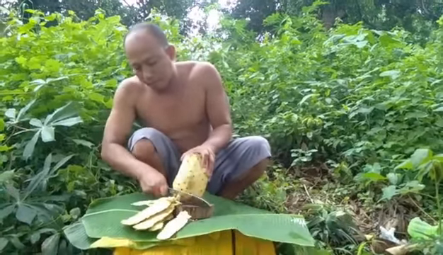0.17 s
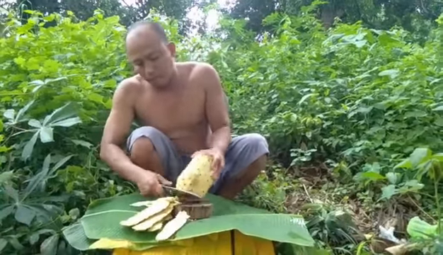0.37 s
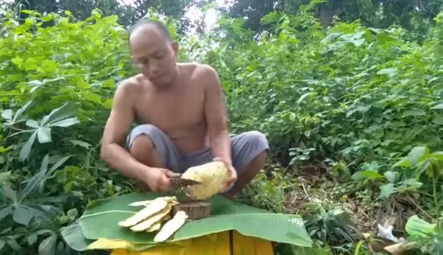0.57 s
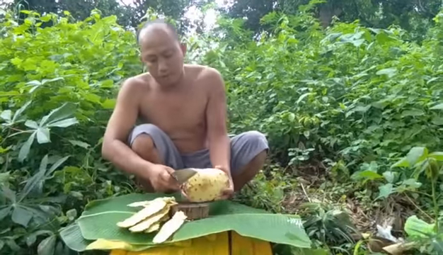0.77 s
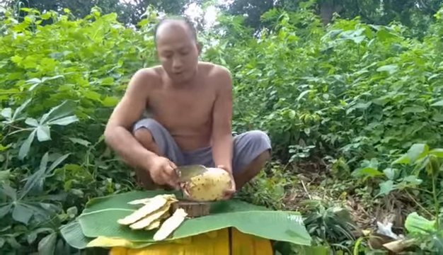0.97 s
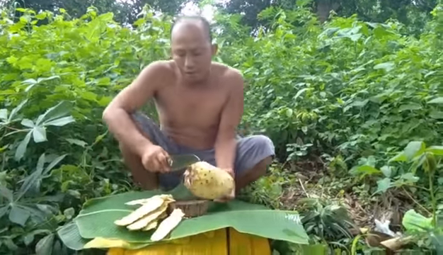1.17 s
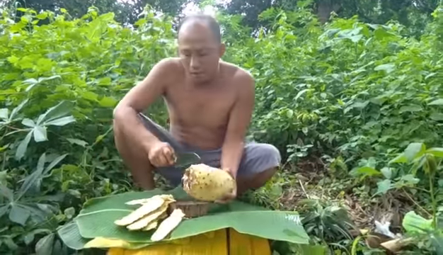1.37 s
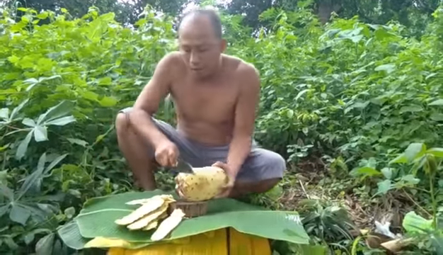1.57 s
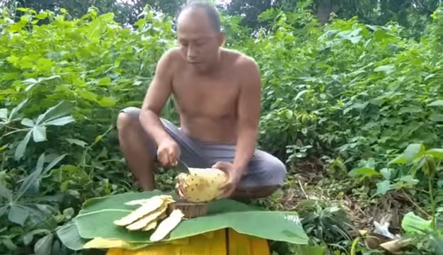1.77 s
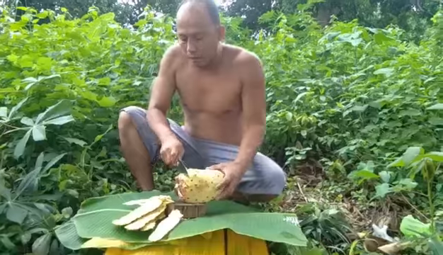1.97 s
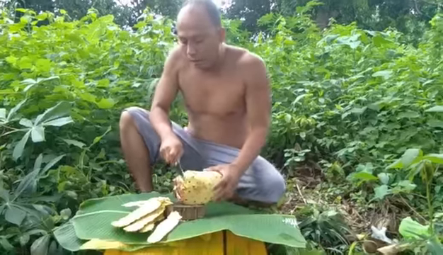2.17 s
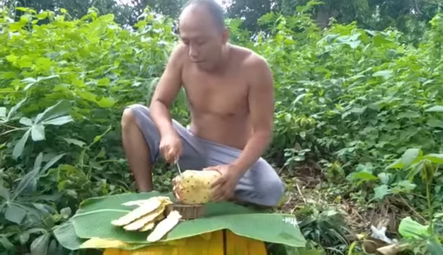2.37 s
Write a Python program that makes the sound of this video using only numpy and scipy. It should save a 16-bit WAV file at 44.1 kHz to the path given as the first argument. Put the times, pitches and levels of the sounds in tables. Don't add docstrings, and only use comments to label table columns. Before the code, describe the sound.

Cleaver cutting pineapple rind with crisp snaps and one woody chop, insects and birds around

```python
import sys
import numpy as np
from scipy import signal
from scipy.fft import rfft, irfft
from scipy.io import wavfile

SR = 44100
rng = np.random.default_rng(int(sys.argv[2]) if len(sys.argv) > 2 else 0)


def pcm_store(signal):
    levels = np.round(np.clip(np.atleast_2d(signal), -1, 1) * 32767)
    wavfile.write(sys.argv[1], SR, levels.astype(np.int16).T)


def to_linear_factor(level_db):
    exponent = np.asarray(level_db, float) / 20
    return 10 ** exponent


N = 110250
T = np.arange(N) / SR


def rms_one(x):
    return x / np.sqrt(np.mean(x ** 2) + 1e-20)


def drift(rate_hz):
    r = np.exp(-2 * np.pi * rate_hz / SR)
    wander = signal.lfilter([1], [1, -2 * r, r * r], rng.standard_normal(N + SR))
    return rms_one(wander[SR:])


def click_at(start_s):
    return 1. * (np.arange(N) == int(start_s * SR))


def ring(clicks, hz, t60_s):
    r = to_linear_factor(-60 / (t60_s * SR))
    w = 2 * np.pi * hz / SR
    return signal.lfilter([0, np.sin(w)], [1, -2 * r * np.cos(w), r * r], clicks + 1e-18)


def curve(rows):
    db = np.interp(T, *np.transpose(rows))
    return db - db.mean()


def bed(spectrum, patchy_db, low_db=0):
    hz = np.fft.rfftfreq(N, 1 / SR) + 1
    at_hz, at_db = np.transpose(spectrum)
    colour_db = np.interp(np.log(hz), np.log(at_hz), at_db, -120, -120)
    tint = rfft(rng.standard_normal(N)) * to_linear_factor(colour_db)
    band = np.floor(2 * np.log2(hz))
    lowest, highest = int(2 * np.log2(at_hz[0])), int(2 * np.log2(at_hz[-1]))
    out = 0
    for k in range(lowest, highest + 1):
        level_db = patchy_db * drift(5.0) + low_db * (k < 16)
        out = out + irfft(tint * (band == k), N) * to_linear_factor(level_db)
    return rms_one(out)


# pitch_hz, level_db (per Hz)
AIR = [(18, -36), (30, -25.5), (113, -1.5), (191, -11.5), (210, -15.5), (256, -13.5), (462, -25.5),
       (544, -25.5), (1500, -31.5), (1950, -47), (3300, -120)]
AIR_DB, AIR_PATCHY_DB = -46.5, 0.5
# time_s, level_db
BREEZE = [(0.0, -49), (0.29, -45.5), (0.51, -48.5), (1.02, -48), (1.29, -49.5), (1.52, -49), (1.9, -49.5),
          (2.02, -51.5), (2.5, -50)]
# pitch_hz, level_db (per Hz)
INSECT_HISS = [(880, -36), (1500, -3), (1970, -3), (2380, -4.5), (4890, -4), (6410, 0.5), (7540, -8),
               (7950, -15), (9500, -27), (12400, -46), (20900, -120)]
INSECT_DB, INSECT_PATCHY_DB = -57.5, 1.33
# time_s, level_db
CHORUS = [(0, 5.5), (.3, 1), (.55, 4), (.85, 0.5), (1.1, 7), (1.4, 3), (1.7, 7), (2.1, -0.5), (2.5, 5)]
# pitch_hz, level_db (per Hz)
MIC_HISS = [(5000, -43), (8500, -4), (10700, -3), (12400, -8), (14900, -3), (15700, -3)]
MIC_HISS_DB, MIC_PATCHY_DB = -81, 0.73


def garden():
    insects = bed(INSECT_HISS, INSECT_PATCHY_DB)
    chorus_band = signal.butter(2, [5200, 7800], "band", fs=SR, output="sos")
    chorus = signal.sosfilt(chorus_band, insects)
    insects = insects + (to_linear_factor(curve(CHORUS)) - 1) * chorus
    rumble = bed(AIR, AIR_PATCHY_DB, curve(BREEZE))
    return to_linear_factor(AIR_DB) * rumble + to_linear_factor(MIC_HISS_DB) * bed(MIC_HISS, MIC_PATCHY_DB) + to_linear_factor(INSECT_DB) * insects


LEAF_T60_S, LEAF_LIFT_HZ, LEAF_LIFT_DB = 0.44, 9367, -41
TWIG_T60_S, TWIG_DB = 0.074, -13


def foliage(x, wet_db):
    lag = np.arange(SR) / SR
    leaves = rng.standard_normal(SR)
    leaves = leaves + to_linear_factor(LEAF_LIFT_DB) * rms_one(ring(leaves, LEAF_LIFT_HZ, 0.0028))
    haze = to_linear_factor(-60 * lag / LEAF_T60_S)
    twigs = to_linear_factor(TWIG_DB - 60 * lag / TWIG_T60_S)
    tail = leaves * (haze + twigs) * np.minimum(lag / 0.0029, 1)
    tail = tail / np.sqrt(np.sum(tail ** 2))
    return x + to_linear_factor(wet_db) * signal.fftconvolve(x, tail)[:len(x)]


# start_s, level_db, top_pitch_hz
CHIPS = [
    (-.016, -43.5, 8770),
    (0.228, -42, 8660),
    (.664, -43, 8850),
    (0.959, -47, 8930),
    (1.411, -45.5, 8830),
    (1.924, -49, 9030),
]
CHIP_HOLD_S, CHIP_LIFT_HZ_PER_S, CHIP_FALL_HZ_PER_S2 = .008, 25000, 8.2e6
CHIP_SWELL_S, CHIP_RISE_DB_PER_S = 0.027, 450
CHIP_FLOOR_HZ, CHIP_FADE_DB_PER_HZ = 6900, .006
CHIP_THROAT_DB, CHIP_OVERTONE_DB, CHIP_ECHO_DB = 4.5, -39, 2.4


def chips():
    lead = SR // 20
    t = np.arange(SR // 20) / SR
    out = np.zeros(N + SR)
    for start_s, db, top_hz in CHIPS:
        plunge_hz = CHIP_FALL_HZ_PER_S2 * np.maximum(t - CHIP_HOLD_S, 0) ** 2
        hz = np.maximum(top_hz + CHIP_LIFT_HZ_PER_S * t - plunge_hz, 0)
        rise_db = CHIP_RISE_DB_PER_S * np.minimum(t - CHIP_SWELL_S, 0)
        fade_db = CHIP_FADE_DB_PER_HZ * np.maximum(CHIP_FLOOR_HZ - hz, 0)
        throat_db = CHIP_THROAT_DB * np.exp(-((hz - 7100) / 500) ** 2)
        tremble_db = 1.6 * drift(290.0)[:len(t)]
        level = to_linear_factor(db + rise_db - fade_db + throat_db + tremble_db) * np.minimum(t / 0.0029, 1)
        turn = 2 * np.pi * np.cumsum(hz) / SR
        note = np.sin(turn) + to_linear_factor(CHIP_OVERTONE_DB) * np.sin(2 * turn)
        i = int(start_s * SR) + lead
        out[i:i + len(t)] += level * note
    return foliage(out, CHIP_ECHO_DB)[lead:lead + N]


def swell(start_s, length_s, edge_s):
    opening = T - start_s
    closing = (start_s + length_s - T) / 2 + edge_s
    return np.clip(np.minimum(opening, closing) / edge_s, 0, 1) ** 2


# start_s, length_s, level_db, pitch_hz, glide_hz_per_s
WHISTLES = [(.018, .022, -53, 2900, 2000), (.05, .035, -57, 3000, 0), (.167, .013, -48, 3800, 8000),
            (1.865, .1, -56, 3900, 300), (1.88, .075, -56, 3800, 300), (1.96, .115, -65, 3930, 0),
            (2.333, .008, -59, 4850, 0), (2.357, .03, -59, 4350, -3000), (2.397, .03, -58, 4400, -4000),
            (2.395, .025, -62, 4850, 0), (2.412, .016, -57, 4830, 0), (2.386, .018, -56, 4050, -4000),
            (2.41, .018, -62, 3800, 0), (2.44, .035, -59, 4200, 5000), (2.435, .045, -62, 4830, 0),
            (2.48, .03, -59, 4840, 0), (1.95, .24, -64, 712, 0), (2.15, .09, -67, 5050, 0)]
WARBLE_HZ, WARBLE_DB, FAR_ECHO_DB = 30, 2.2, -8


def whistles():
    wobble = drift(40.0)
    flicker = to_linear_factor(WARBLE_DB * drift(70.0))
    out = 0
    for start_s, length_s, db, pitch_hz, glide in WHISTLES:
        hz = pitch_hz + glide * (T - start_s) + WARBLE_HZ * wobble * pitch_hz / 4000
        tone = np.sin(2 * np.pi * np.cumsum(hz) / SR)
        out = out + to_linear_factor(db) * swell(start_s, length_s, 0.0021) * tone
    return foliage(flicker * out, FAR_ECHO_DB)


def surge(start_s, length_s):
    rise_s = 0.00062 + 1.0 * length_s ** 2
    t = np.clip(T - start_s, 0, None)
    return np.minimum(t / rise_s, 1) * np.exp(-(t / length_s) ** 3.3)


# start_s, length_s, level_db, brightest_hz, sharpness_q
TEARS = [(.101, 0.01, -43, 6700, 1.2), (0.109, 0.026, -47.5, 5900, 2.2), (.131, .008, -38.5, 6150, 3.6),
         (.131, 0.0092, -41.5, 4740, 10), (.131, 0.0063, -47.5, 1600, 3.3), (0.132, 0.1, -50.5, 4700, 0.56),
         (0.236, .018, -43, 3830, 25.0), (.189, 0.0074, -37, 5250, 1.1), (.189, 0.0092, -42.5, 3730, 5.2),
         (0.199, 0.015, -42.5, 3900, 5.4), (.211, 0.0086, -36, 5800, 1.3), (.0958, .006, -43, 5600, 7.0),
         (0.087, 0.022, -49, 6500, 1.5), (.7, .08, -62, 6200, 1.3), (.2225, .0025, -30, 6200, 6.0),
         (.224, .0045, -26, 1600, 5.0), (.2345, .006, -32, 980, 4.0), (2.36, .12, -60, 4400, 2.5),
         (1.07, 0.13, -55, 4600, 1.24), (0.98, 0.27, -54.5, 1570, 0.77), (1.238, 0.021, -49.5, 6700, 4),
         (2.245, 0.0098, -52, 6100, 1.4), (2.372, .035, -59, 6600, 4.0), (2.37, .06, -60, 4200, 5.0),
         (.09, 0.025, -51.5, 1600, 4.3), (.103, 0.013, -50.5, 2350, 3.7), (.2235, 0.0052, -20, 1780, 0.77),
         (.2235, 0.004, -30, 3920, 8.0), (0.2, 0.0081, -38.5, 6300, 2.0), (0.227, 0.031, -38.5, 1100, 0.18),
         (0.236, 0.084, -51, 670, 0.24), (2.19, 0.11, -60.5, 1170, 1.8), (1.43, 0.11, -66, 6500, 3.0),
         (0.91, 0.34, -55.5, 383, 0.98)]
# start_s, length_s, level_db, brightest_hz
SPRAYS = [(0, .07, -65, 12000), (.085, .07, -59, 12500), (.13, .06, -64, 13000), (.19, .003, -56, 15000),
          (.192, .03, -56, 12500), (.686, .016, -65, 11500), (.735, .045, -65, 11000),
          (.968, .006, -60, 11500), (1.18, .007, -67, 11500), (1.43, .012, -68, 12000),
          (1.594, .007, -61, 12000), (2.136, .012, -63, 11500), (2.247, .01, -63, 13000),
          (2.317, .008, -65, 13000)]
SPRAY_Q = 1.5
FIBRES_PER_S, FIBRE_SPREAD_DB, TEAR_AIR_DB = 8000, 2.6, -20


def tears():
    sizes = to_linear_factor(FIBRE_SPREAD_DB * np.minimum(rng.exponential(1, N), 5))
    sizes = sizes * rng.choice([-1, 1], N)
    snaps = rms_one(sizes * (rng.random(N) < FIBRES_PER_S / SR))
    snaps = snaps * to_linear_factor(2.2 * drift(240.0))
    strokes = TEARS + [(*row, SPRAY_Q) for row in SPRAYS]
    out = 0
    for k, (start_s, length_s, db, hz, q) in enumerate(strokes):
        own = np.roll(snaps, 977 * k)
        peak = signal.iirpeak(hz, q, fs=SR)
        tone = signal.lfilter(*peak, signal.lfilter(*peak, own))
        dry_edge = to_linear_factor(TEAR_AIR_DB) * np.diff(own, prepend=0)
        out = out + to_linear_factor(db) * surge(start_s, length_s) * (rms_one(tone) + dry_edge)
    return out


# start_s, peak_db, pitch_hz, ring_cycles
TICKS = [(.093, -45, 588, 30), (0.192, -36.5, 590, 12), (1.034, -44, 5240, 12), (1.142, -35, 6400, 22),
         (1.155, -30, 400, 6.6), (1.183, -36, 7000, 28), (1.182, -55, 2300, 6.0), (1.367, -41.5, 890, 20),
         (1.545, -39, 2210, 18), (1.562, -31.5, 5500, 8.7), (1.593, -40.5, 2050, 12),
         (1.686, -35, 4800, 7.5), (1.703, -38, 9000, 6.0), (1.786, -47.5, 742, 49), (1.79, -50.5, 918, 110),
         (1.863, -40.5, 1610, 8.3), (2.069, -43, 5800, 17), (.2098, -25, 5600, 8.0), (.2345, -22, 1034, 28),
         (.2352, -24, 894, 26), (.2385, -33, 3920, 60), (.247, -36, 3950, 60), (.2245, -18, 1570, 20),
         (2.144, -47, 12300, 14), (2.353, -37, 11000, 4.0), (2.2, -55, 770, 40), (2.3547, -31, 4330, 12.5),
         (2.3541, -33, 5700, 24), (2.3549, -29.5, 6700, 33), (2.354, -28, 1240, 2.6),
         (1.787, -39, 6950, 33), (1.821, -40, 7040, 43), (2.32, -56, 7000, 8.0)]
TICK_BODY_Q = 1.5


def ticks():
    out = 0
    for start_s, db, hz, cycles in TICKS:
        touches = click_at(start_s) - 0.28 * click_at(start_s + 2.36 / hz)
        push = signal.lfilter(*signal.iirpeak(hz, TICK_BODY_Q, fs=SR), touches)
        out = out + to_linear_factor(db) * ring(push, hz, cycles / hz)
    return out


# start_s, level_db, contact_softness_hz, direction
BLOWS = [
    (.2219, -18.5, 1480, -0.78),
    (.2225, -7.5, 1580, 0.97),
    (0.2234, -21, 3980, 0.93),
    (0.235, -23, 1110, 0.77),
    (0.2365, -24, 1110, 0.88),
    (.238, -18.5, 1050, 0.88),
]
# pitch_hz, level_db, t60_s
BLOCK = [(183, -20.5, 0.032), (338, -16.5, 0.0175), (512, -11, 0.019), (780, -24, 0.015),
         (886, -20.5, 0.051), (1042, -7.5, 0.016), (1260, -11, 0.01), (1558, -5, 0.018),
         (1830, -14.5, 0.033), (2050, -9, 0.022), (2850, -8.5, 0.029), (104, -24, 0.06),
         (3910, -9.5, 0.045), (6100, -3, 0.014)]
THUD_DB = -22


def chop():
    luck_db = rng.normal(0, 2, (len(BLOWS), len(BLOCK)))
    out = 0
    for (start_s, db, soft_hz, way), own_db in zip(BLOWS, luck_db):
        push = signal.lfilter(*signal.butter(2, soft_hz, fs=SR), way * click_at(start_s))
        out = out - to_linear_factor(db + THUD_DB) * push * SR / soft_hz / 20
        for (hz, mode_db, t60_s), extra_db in zip(BLOCK, own_db):
            out = out - to_linear_factor(db + mode_db + extra_db) * ring(push, hz, t60_s)
    return signal.lfilter(*signal.butter(2, 120.0, "high", fs=SR), out)


KNIFE_DULL_HZ, KNIFE_TOP_DB = 8200, -13


def scene():
    birds_and_garden = garden() + chips() + whistles()
    knife = tears() + ticks() + chop()
    dull = signal.filtfilt(*signal.butter(3, KNIFE_DULL_HZ, fs=SR), knife)
    return (birds_and_garden + dull + to_linear_factor(KNIFE_TOP_DB) * (knife - dull))[None]


def low_pass(x):
    return signal.sosfilt(signal.butter(12, 16340, fs=SR, output="sos"), x)


def record(dry):
    top_cut = signal.cheby2(20, 60, 15720, fs=SR, output="sos")
    mix = signal.sosfilt(top_cut, dry)
    return low_pass(mix)


dry = scene()
out = record(dry)
pcm_store(out)
```